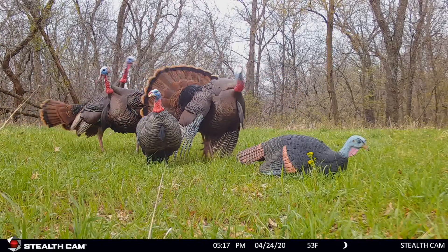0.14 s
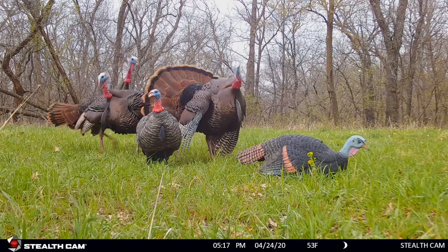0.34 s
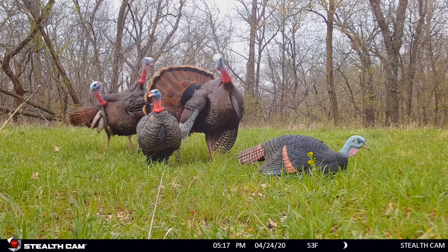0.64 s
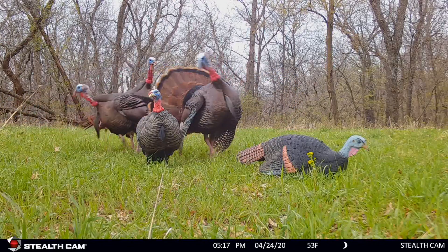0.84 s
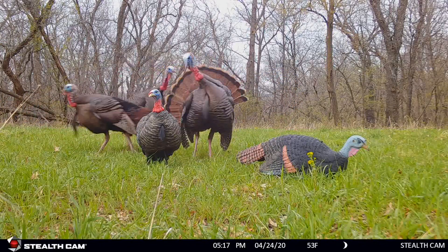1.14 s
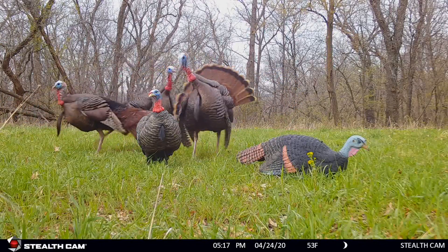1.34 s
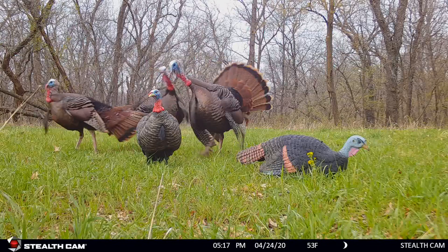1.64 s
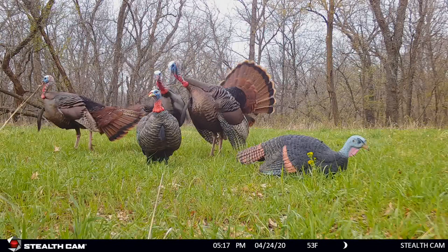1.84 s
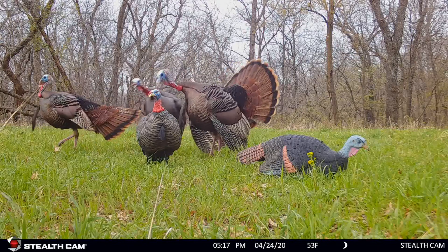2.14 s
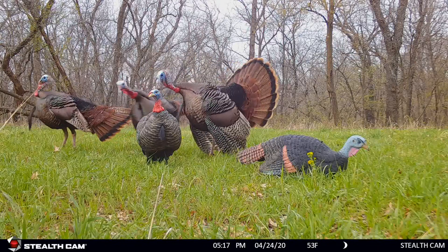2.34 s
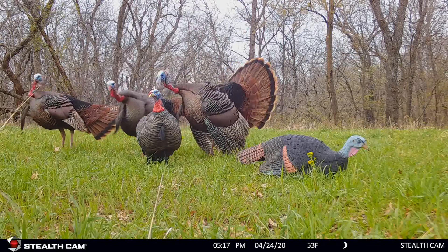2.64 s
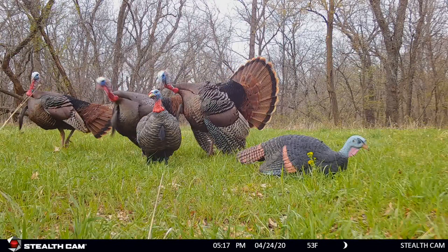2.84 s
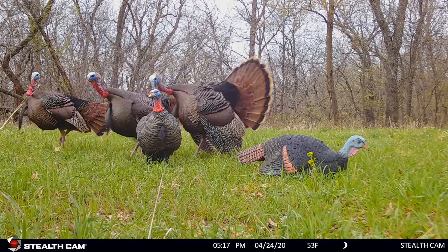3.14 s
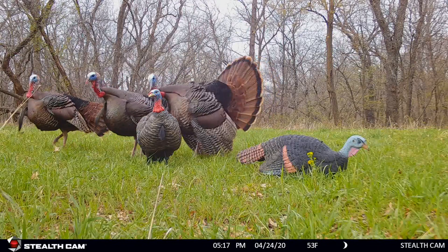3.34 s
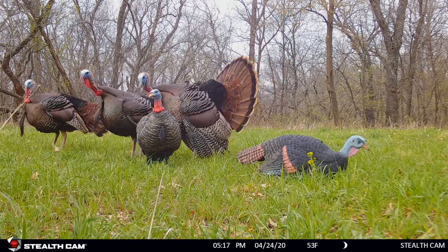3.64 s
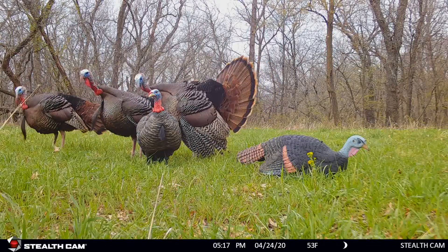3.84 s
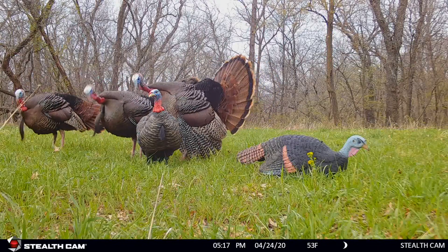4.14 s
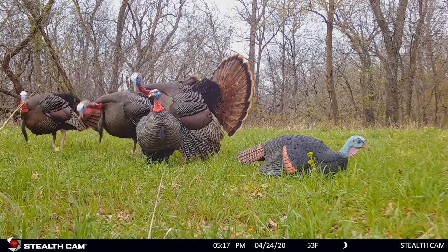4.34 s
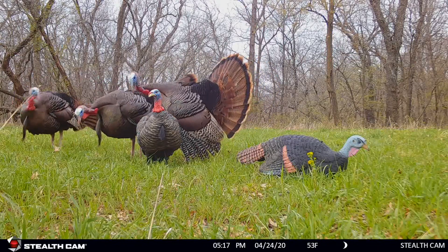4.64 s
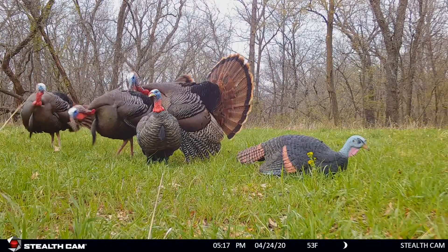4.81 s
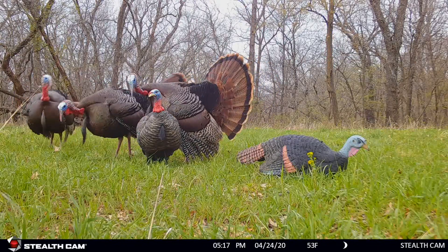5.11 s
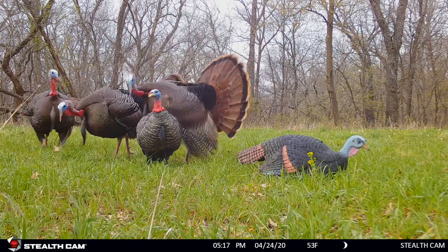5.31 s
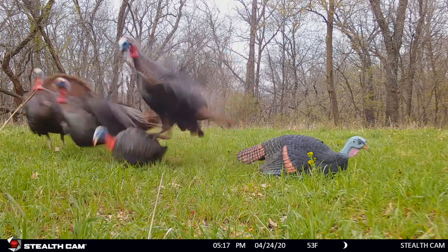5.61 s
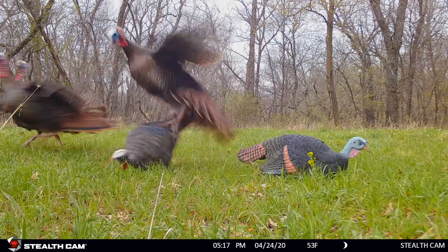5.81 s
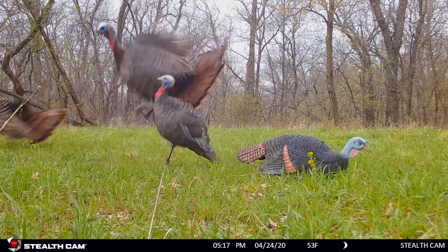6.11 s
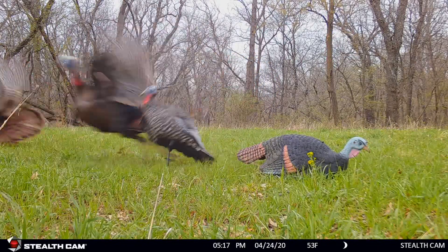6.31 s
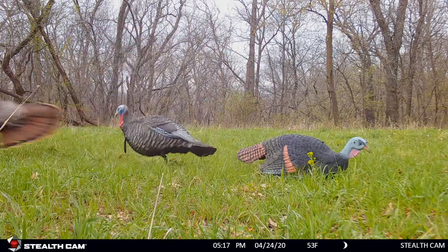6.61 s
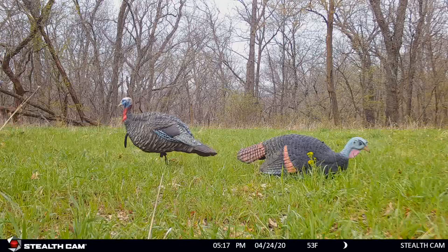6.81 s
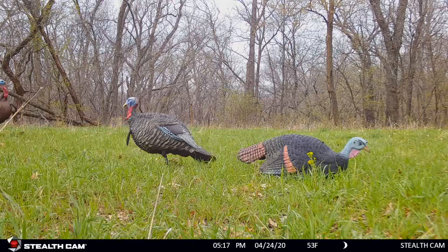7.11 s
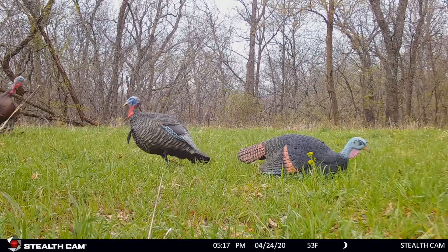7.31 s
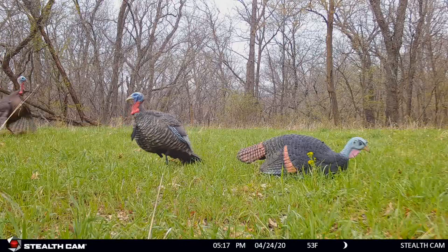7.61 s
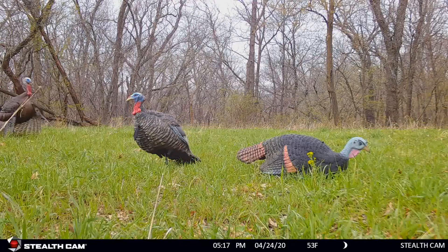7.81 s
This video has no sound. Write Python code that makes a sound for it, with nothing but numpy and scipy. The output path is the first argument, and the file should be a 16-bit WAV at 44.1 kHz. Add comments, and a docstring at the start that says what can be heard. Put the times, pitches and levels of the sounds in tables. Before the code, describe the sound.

Quiet purring from several turkeys, in short groups of quick low pulses, with dry stem ticks and slight feather brushing. After five seconds wind puffs and a thump lead into a sudden fight, with overloaded blows, crackling quills, flapping wings and a second burst shortly after. A hollow plastic decoy is knocked softly, then footsteps rustle through grass, one bird whines gently and faint purr notes return. Near, dry, open-air sound.

```python
"""Wild turkeys purr in gliding, swelling tones and step through rustling grass at a wood's edge.
A scuffle breaks out on a hollow plastic decoy: grainy noise makes feather swishes and wing flaps,
damped sines make snaps, thumps and a hollow knock, and the peaks overload the recorder.
Grass and footsteps return and one bird whines softly with a fluttering tone.
Shaped noise makes wind buffets, far rumble and steady hiss; a songbird whistles far away."""
import sys
import numpy as np
from scipy import signal
from scipy.fft import rfft, irfft, next_fast_len
from scipy.io import wavfile
from scipy.ndimage import uniform_filter1d, map_coordinates

SR = 44100
rng = np.random.default_rng(int(sys.argv[2]) if len(sys.argv) > 2 else 0)


def dump(signal):
    """Clip the signal to [-1, 1] and save it as 16-bit WAV at the path in sys.argv[1]."""
    limited = np.clip(np.atleast_2d(signal).T, -1, 1)
    pcm = np.round(limited * 32767).astype(np.int16)
    wavfile.write(sys.argv[1], SR, pcm)


N = 351036  # length in samples


def amp(db):
    """Decibels to linear amplitude."""
    return 10 ** (np.asarray(db) / 20)


def unit(x):
    """Scales x to an rms of 1."""
    return x / np.sqrt(np.mean(x ** 2) + 1e-20)


def curves(rows):
    """One value per sample for each column after the time."""
    s, *columns = np.transpose(rows)
    return [np.interp(np.arange(N) / SR, s, column) for column in columns]


def wobble(rate):
    """A smooth random curve, rate knots a second."""
    knots = rng.standard_normal(int(N * rate / SR) + 4)
    return map_coordinates(knots, [np.arange(N) * rate / SR])


def filtered(x, response):
    """Weights the spectrum of x by a function of frequency in Hz."""
    size = next_fast_len(N + 8192)
    spectrum = rfft(x, size) * response(np.fft.rfftfreq(size, 1 / SR))
    return irfft(spectrum, size)[..., :N]


def gain_at(spectrum):
    """The gain through (Hz, dB) points, read on a log frequency axis."""
    f, db = np.transpose([(1, -120), *spectrum, (SR / 2, -120)])
    return lambda hz: amp(np.interp(np.log(hz + 1), np.log(f), db))


def noise(spectrum, grain_db, grain_rate, patchy_db):
    """Noise of rms 1, broken into grains, with patches of random gain, coloured by (Hz, dB) points."""
    grains = rng.standard_normal(N) * amp(grain_db * wobble(grain_rate))
    z = signal.stft(grains, nperseg=256)[2]
    # Smoothing over frequency, then time, turns random gains into patches
    patches = uniform_filter1d(rng.standard_normal(z.shape), 6, 0)
    patches = uniform_filter1d(patches, 4, 1)
    x = signal.istft(z * amp(patchy_db * unit(patches)), nperseg=256)[1][:N]
    return unit(filtered(x, gain_at(spectrum)))


def add(out, s, x):
    """Mixes x into out, centred on second s."""
    i = round(s * SR) - len(x) // 2
    out[i:i + len(x)] += x[:N - i]


# Puffs of air on the microphone port. Each row: time of peak in seconds, level in dB, fall time in seconds.
GUST_PUFFS = [(2.163, -50, 0.082), (4.41, -52, 0.083), (4.7, -41.5, 0.085), (5.26, -36.5, 0.095),
              (5.487, -30, .04), (5.63, -39, 0.056), (5.83, -31, 0.027), (6.15, -48, .3), (6.78, -48, 0.19)]
CALM_DB, GUST_RISE = -60, 0.48  # wind between puffs; rise time over fall time


def gusts():
    """A calm wind with puffs that rise and die away exponentially."""
    t = np.arange(N) / SR
    wind = np.full(N, amp(CALM_DB))
    for s, db, fall in GUST_PUFFS:
        wind += amp(db) * np.exp(-np.abs(t - s) / np.where(t < s, GUST_RISE * fall, fall))
    return wind


# Colour of wind on the port. Each row: frequency in Hz, relative gain in dB.
BUFFET_COLOUR = [(12, -22), (25, -4.5), (60, -3.5), (100, -19)]


def wind_buffet():
    """Wind buffets the microphone port: very low noise rides on the gusts."""
    level = gusts() * amp(1.3 * wobble(14.0))
    return level * noise(BUFFET_COLOUR, grain_db=0.1, grain_rate=20, patchy_db=-1.3)


# Level of the far rumble. Each row: time in seconds, level in dB.
RUMBLE_LEVEL = [(0, -55), (0.68, -57), (5.09, -56), (5.3, -51.5), (6.6, -53.5), (6.742, -54), (7.076, -61),
                (7.96, -52.5)]
# Colour of the far rumble. Each row: frequency in Hz, relative gain in dB.
RUMBLE_COLOUR = [(50, -6), (90, 0.5), (160, -2), (430, -11.5), (800, -21.5)]


def tree_rumble():
    """Wind in far trees: low noise that slowly swells and sinks."""
    level = amp(curves(RUMBLE_LEVEL)[0] + 0.89 * wobble(11))
    return level * noise(RUMBLE_COLOUR, grain_db=0.76, grain_rate=50, patchy_db=0.5)


# Colour of the steady hiss. Each row: frequency in Hz, relative gain in dB.
AIR_COLOUR = [(250, -23), (500, -0.5), (850, -2), (1100, -5), (1750, -5), (2060, -8.5), (3800, -12),
              (10000, -15.5), (15500, -16)]


def air_hiss():
    """Broad steady noise under everything."""
    return amp(-61) * noise(AIR_COLOUR, grain_db=.8, grain_rate=25, patchy_db=.8)


# Rustle of walking in grass. Each row: time in seconds, level in dB.
WALK_LEVEL = [(0, -71), (0.8, -63.5), (1.7, -65), (2.05, -69.5), (2.3, -64), (2.67, -67.5), (3.13, -63),
              (3.7, -69), (4.55, -69.5), (5.3, -63), (6.6, -49), (6.804, -49), (7.1, -54.5), (7.96, -55.5)]
# Feet pressing the turf. Each row: time in seconds, level in dB.
FOOT_LEVEL = [(6.6, -55.5), (6.69, -55), (6.85, -58), (7.1, -64), (7.15, -53), (7.25, -66), (7.36, -56.5),
              (7.42, -64), (7.584, -55), (7.75, -56.5), (7.85, -56), (7.96, -61)]
# Colour of brushed grass. Each row: frequency in Hz, relative gain in dB.
GRASS_COLOUR = [(1180, -42), (2000, -11), (2160, -37), (2700, -18.5), (3700, -11), (8290, -2.5),
                (11600, -8.5), (15500, -20)]
# Colour of bodies and feet pressing. Each row: frequency in Hz, relative gain in dB.
BODY_COLOUR = [(200, -6), (320, -4), (1000, -14.5), (1750, -17.5), (2300, -20.5)]


def walking():
    """Blades rub in a bright grainy rustle; later, feet press the turf in duller noise."""
    t = np.arange(N) / SR
    walk = amp(curves(WALK_LEVEL)[0] + 1.2 * wobble(25))
    grass = walk * noise(GRASS_COLOUR, grain_db=1.0, grain_rate=1100, patchy_db=3.0)
    press = (t > FOOT_LEVEL[0][0]) * amp(curves(FOOT_LEVEL)[0] + 2.5 * wobble(70))
    return grass + press * noise(BODY_COLOUR, grain_db=3, grain_rate=300, patchy_db=1.2)


# The scuffle. Each row: time in seconds, feather hiss level in dB, wing flap level in dB.
SCUFFLE_LEVEL = [(5.3, -70, -47), (5.39, -47.5, -53), (5.445, -31.5, -35), (5.488, -25, -40),
                 (5.56, -29, -33), (5.61, -28, -24.5), (5.676, -35, -32), (5.834, -38, -42.5),
                 (5.936, -42.5, -41.5), (6.106, -40, -48), (6.24, -35, -54), (6.316, -30.5, -30.5),
                 (6.458, -40, -46), (6.6, -54, -58)]
# Colour of feather barbs. Each row: frequency in Hz, relative gain in dB.
FEATHER_COLOUR = [(1500, -54), (2290, -8), (2770, -4.5), (7100, 2), (8340, 2.5), (9800, -2.5), (15500, -13)]
# Colour of wing flaps. Each row: frequency in Hz, relative gain in dB.
FLAP_COLOUR = [(35, -20), (86, 15), (230, -9), (330, -16), (500, -33)]
BODY_DB, BODY_GROWS = -39.5, 1.35  # bodies colliding: level at the median hiss; swings wider than the hiss


def scuffle():
    """Hiss of feathers, colliding bodies and low wing flaps run together as three noises."""
    hiss_db, flap_db = curves(SCUFFLE_LEVEL)
    body_db = BODY_DB + BODY_GROWS * (hiss_db - np.median(SCUFFLE_LEVEL, axis=0)[1])
    hiss = amp(hiss_db + 2.5 * wobble(60))
    hiss = hiss * noise(FEATHER_COLOUR, grain_db=4.5, grain_rate=2000, patchy_db=2.2)
    body = amp(body_db + 1.5 * wobble(60))
    body = body * noise(BODY_COLOUR, grain_db=2.5, grain_rate=500, patchy_db=.7)
    flap = amp(flap_db + 1.3 * wobble(30))
    flap = flap * noise(FLAP_COLOUR, grain_db=0.5, grain_rate=230, patchy_db=5.0)
    return hiss + body + flap


def commotion():
    """Walking gives way to the scuffle and returns after it, with short crossfades."""
    t = np.arange(N) / SR
    edge = np.minimum(t - SCUFFLE_LEVEL[0][0], SCUFFLE_LEVEL[-1][0] - t)
    fight = np.clip(edge / 0.025, 0, 1)
    return fight * scuffle() + (1 - fight) * walking()


# Turkey purr notes. Each row: time of peak in seconds, level in dB, length in seconds,
# nominal start pitch in Hz, nominal end pitch in Hz.
PURR_NOTES = [(0.1282, -42, 0.014, 670, 622), (0.187, -43, .011, 760, 830),
              (0.2337, -39.5, 0.0082, 650, 1000), (0.2839, -42, .01, 730, 1056),
              (0.3286, -45, .008, 660, 937), (1.2282, -37, 0.021, 760, 570), (1.303, -35, 0.016, 790, 684),
              (1.3085, -43, 0.007, 720, 1006), (1.3513, -40, 0.0064, 620, 914),
              (1.4051, -49.5, 0.0065, 940, 1310), (2.1556, -28.5, 0.014, 796, 580),
              (2.2023, -36.5, .01, 740, 1105), (2.2469, -36.5, 0.012, 770, 1140),
              (2.2965, -41.5, 0.011, 770, 1210), (3.2266, -38.5, 0.015, 560, 647),
              (3.299, -48, 0.0068, 750, 726), (3.3135, -32.5, 0.01, 644, 943),
              (3.359, -36.5, 0.01, 600, 1080), (3.4087, -45, 0.01, 773, 1070),
              (3.4574, -49, .015, 630, 864), (3.529, -50, 0.011, 600, 680),
              (3.5389, -44.5, 0.0058, 866, 1080), (3.579, -51, .005, 900, 990),
              (3.62, -40, 0.0054, 630, 1100), (3.6629, -45, 0.0069, 700, 1130),
              (4.3897, -31, 0.019, 808, 521), (4.4401, -37, .008, 570, 876),
              (4.4892, -36.5, 0.0039, 740, 977), (4.5342, -46.5, .008, 730, 920),
              (7.8392, -41.5, 0.01, 740, 830), (7.9328, -42.5, 0.01, 800, 1125)]
RISE_UP, RISE_DOWN = 0.402, 0.65  # share of a note spent swelling, for upward and downward glides
GLIDE_MID, GLIDE_SPAN = 0.5, 0.27  # middle and width of the glide as shares of the note
BEAK_HZ, BEAK_WIDTH_HZ, BEAK_DB = 1170, 200, 13  # a resonance that lifts the second partial of low notes
THROAT_FROM_HZ = 850  # higher notes drive the throat resonance harder
TRAIL_S, TRAIL_DB = .004, -9  # upward glides get a fainter copy just behind, so that they beat
WAVER_HZ = 25  # how far a note's pitch wanders


def notes(table, unsteady_db, overtone_db, throat_db, flick_hz):
    """Short tones that swell and glide; beak and throat resonances lift their overtones."""
    out, t = np.zeros(N), np.arange(-.1, .1, 1 / SR)
    waver = np.tile(WAVER_HZ * wobble(250), 2)
    for s, db, length, start_hz, end_hz in table:
        upward = end_hz > start_hz
        rise = length * (RISE_UP if upward else RISE_DOWN)
        fall = length - rise
        glide = np.tanh(((t + rise) / length - GLIDE_MID) / GLIDE_SPAN)
        hz = (start_hz + end_hz) / 2 + 0.6 * (end_hz - start_hz) * glide
        # Upward glides flick higher still as they fade
        hz += flick_hz * upward * np.clip(t / fall - .8, 0, 2)
        beak = np.exp(-((2 * hz - BEAK_HZ) / BEAK_WIDTH_HZ) ** 2)
        second = amp(overtone_db + BEAK_DB * beak)
        phase = 2 * np.pi * np.cumsum(hz + waver[round(s * SR):][:len(t)]) / SR
        swell = np.exp(-1.15 * np.abs(t / np.where(t < 0, rise, fall)) ** 2.5)
        # Partials 3 to 6 are heard where they fall near 3500 Hz
        throat = sum(np.sin(k * phase) * np.exp(-((k * hz - 3500) / 500) ** 2) for k in range(3, 7))
        throat = amp(throat_db) * (hz / THROAT_FROM_HZ) ** 2 * throat
        tone = amp(db) * swell * (np.sin(phase) + second * np.sin(2 * phase) + throat)
        add(out, s, tone)
        add(out, s + TRAIL_S, amp(TRAIL_DB) * upward * tone)
    return out * amp(unsteady_db * wobble(220))


def purrs():
    """Turkey purrs: quick low notes, coloured by beak and throat."""
    return notes(PURR_NOTES, unsteady_db=1.8, overtone_db=-28.5, throat_db=-27, flick_hz=250)


# Feathers and grass brushed. Each row: time of peak in seconds, level in dB, length in seconds,
# share of bright barbs in dB, share of the body under them in dB.
BRUSHES = [(0.233, -63.5, 0.048, -4, -15), (0.964, -64, 0.049, 2, -19), (1.1085, -56, 0.025, 3, -2),
           (1.384, -55, 0.053, -1.5, -1.5), (2.691, -57.5, 0.021, -2, -13), (3.162, -53.5, 0.039, -1.5, -5),
           (4.286, -53.5, .013, -4, -20), (4.843, -61, .042, -2.4, -5), (5.398, -34.5, 0.016, -2.5, -11.5),
           (5.47, -7.5, 0.0087, -6.5, -3), (5.5062, -13.5, 0.007, -1, -8), (5.515, -8, 0.011, -3, -12),
           (5.532, -21, 0.0063, -15, 5), (5.5913, -19, 0.034, -2.5, 0.5), (5.696, -35, 0.012, 1, 8),
           (5.762, -34, 0.013, -1.5, -1.5), (5.797, -32, 0.005, -4, 6), (5.817, -34, 0.019, -3.5, 6.5),
           (5.85, -32.5, 0.013, 2, -0.5), (5.9, -41, 0.013, -5, 1), (5.927, -38.5, 0.014, 2, 0.5),
           (6.018, -35, 0.02, -3.5, -5), (6.054, -49, .016, -7.6, -11), (6.099, -42, 0.0092, 10, 3),
           (6.108, -23.5, 0.0078, -2.5, -12), (6.125, -23, 0.019, -3.5, -4),
           (6.177, -26.5, 0.011, -6, -0.5), (6.212, -22, 0.0091, -14, -5), (6.2737, -19, 0.017, -2.5, -6),
           (6.296, -24.5, 0.014, -1.5, -4.5), (6.33, -32.5, .012, -18, -11), (6.3664, -28, 0.012, -23, 2.5),
           (6.396, -28, 0.012, -14, -10), (6.454, -35, 0.012, -1.5, -4.5), (6.455, -34.5, 0.0073, -6, -4),
           (6.502, -48, 0.022, -3, 10.5), (6.58, -52.5, 0.031, -8, 4), (6.689, -47, 0.023, -0.5, 0),
           (6.743, -50, 0.017, -4, -12), (6.774, -50.5, 0.014, -3, 0), (6.813, -56, .045, 0, -19),
           (6.917, -48, 0.064, -.6, -7.5), (7.186, -49.5, 0.058, -1, -7.5), (7.365, -67, .045, -1, 6),
           (7.61, -52, 0.11, -1.5, -4.5)]
BRUSH_RISE = 0.4  # share of a brush's length that sets its rise


def swishes():
    """Each brush opens three layers of grainy noise: dull and bright barbs and the body under them."""
    dull, bright, body = np.zeros(N), np.zeros(N), np.zeros(N)
    t = np.arange(-.12, .12, 1 / SR)
    for s, db, length, bright_db, body_db in BRUSHES:
        rise, fall = BRUSH_RISE * length, (1 - BRUSH_RISE) * length
        shape = np.where(t < 0, np.exp(-.7 * (t / rise) ** 2), np.exp(-.75 * t / fall))
        shape = amp(db) * shape
        # The dull layer takes the power that the bright one leaves
        add(dull, s, shape * np.sqrt(np.clip(1 - amp(2 * bright_db), .02, 1)))
        add(bright, s, shape * amp(bright_db))
        add(body, s, shape * amp(body_db))
    barbs = noise(FEATHER_COLOUR, grain_db=5.5, grain_rate=2600, patchy_db=1.5)
    low = filtered(barbs, lambda hz: 1 / (1 + (hz / 7800) ** 12))
    under = noise(BODY_COLOUR, grain_db=2.5, grain_rate=600, patchy_db=.7)
    return dull * unit(low) + bright * unit(barbs - low) + body * under


SMALL_SNAPS, SMALL_HZ = 50, 7000  # how many chance snaps; their typical centre
SMALL_OVER_DB, SMALL_SPREAD_DB = 8, 3.5  # their level over the rustle; its random spread


def small_snaps():
    """Chance snaps whose size follows the rustle of grass and feathers: rows as the main snaps."""
    chance = rng.standard_normal((SMALL_SNAPS, 2))
    s = rng.uniform(.02, N / SR - .02, SMALL_SNAPS)
    rustle_db = np.maximum(curves(WALK_LEVEL)[0], curves(SCUFFLE_LEVEL)[0])[(s * SR).astype(int)]
    db = rustle_db + SMALL_OVER_DB + SMALL_SPREAD_DB * chance[:, 0]
    return np.c_[s, db, SMALL_HZ * np.exp(.18 * chance[:, 1])]


# Quill and stem snaps. Each row: time in seconds, level in dB, centre frequency in Hz.
MAIN_SNAPS = [(0.6815, -40, 8700), (0.7545, -36, 8200), (0.9755, -35, 8900), (1.1192, -41, 12000),
              (1.3808, -42, 7800), (1.7503, -36, 7600), (1.9119, -34.5, 7060), (2.4944, -36, 8100),
              (2.8548, -41, 10000), (3.8288, -38, 7000), (4.1504, -30.5, 6260), (4.7282, -37, 7650),
              (5.3974, -13.5, 7150), (5.4197, -17, 3650), (5.46, -12, 7000), (5.4665, 4, 3100),
              (5.529, 3.8, 5250), (5.5417, 1, 7800), (5.5687, -8, 8300), (5.5855, -12, 7500),
              (5.5941, -11, 7300), (5.5983, 2, 6360), (5.6075, -7, 8900), (5.6211, -22, 6780),
              (5.7033, -7, 9050), (5.7959, -13, 6900), (5.7635, -7.5, 7800), (5.811, -5.5, 6200),
              (5.8116, 0, 3130), (5.9266, -14, 8500), (5.9893, -9.5, 9600), (6.0007, -9.5, 8100),
              (6.0236, -27, 7200), (6.1266, -6, 6700), (6.1653, -4, 5070), (6.177, -20, 6200),
              (6.209, -20, 4450), (6.1956, -26, 5200), (6.2167, -20, 5070), (6.2487, 2.2, 4230),
              (6.2662, 3.3, 5000), (6.2718, -20, 5500), (6.2752, 2, 6030), (6.2769, 6, 5950),
              (6.2987, -11, 8500), (6.3684, 1.5, 3680), (6.3948, -9.5, 5750), (6.4485, -22, 6500),
              (6.6745, -26, 7800), (6.8265, -29, 9000), (7.5833, -35, 7600), (7.6633, -33, 8000),
              (7.7312, -29, 8460)]
# Colour of the cracks in a snap. Each row: frequency in Hz, gain in dB.
STEM_COLOUR = [(1500, -30), (2500, -13), (8300, 2), (11000, -7), (15500, -11)]
KICK_DB = -26  # the low kick under a snap


def snaps():
    """A snap is a few damped cycles at its centre, a spatter of noise cracks and a low kick."""
    out, cracks = np.zeros(N), np.zeros(N)
    t = np.arange(-.01, .01, 1 / SR).clip(0)
    rows = np.r_[MAIN_SNAPS, small_snaps()]
    spatter = rng.standard_normal((len(rows), len(t)))
    for (s, db, hz), puff in zip(rows, spatter):
        ring = np.sin(2 * np.pi * hz * t) * np.exp(-t * hz / 1.35) * np.tanh(t * hz / 0.23)
        kick = amp(KICK_DB) * np.sin(2 * np.pi * 700 * t) * np.exp(-t / 0.002)
        add(out, s - .0004, amp(db) * (ring - kick))
        add(cracks, s - .0006, amp(db - 10.0) * puff * (t > 0) * np.exp(-t / 0.0017))
    return out + filtered(cracks, gain_at(STEM_COLOUR))


# Far whistles. Each row: time of peak in seconds, level in dB, length in seconds,
# nominal start pitch in Hz, nominal end pitch in Hz.
SONG_NOTES = [(3.43, -66, .07, 2340, 2800), (3.595, -65, .055, 2650, 2980), (3.78, -69, .06, 2430, 2620),
              (3.895, -70, .046, 2500, 2800)]


def songbird():
    """A far bird's nearly pure whistles, each gliding upward."""
    return notes(SONG_NOTES, unsteady_db=2.5, overtone_db=-40, throat_db=-60, flick_hz=0)


def radiated(hz):
    """Ground contact radiates little below about 34 Hz."""
    return 1 / (1 + (34.4 / (hz + 1)) ** 2)


# Feet, wing pushes and blows. Each row: time of peak in seconds, level in dB, pitch in Hz.
CONTACTS = [(4.6893, -25.5, 125), (4.706, -26, 55), (4.784, -37, 69), (5.235, -31, 65), (5.2844, -24.5, 87),
            (5.454, -12, 520), (5.4775, 6.5, 192), (5.482, -6.5, 92), (5.4912, -7, 148), (5.5251, -12, 163),
            (5.5427, -18, 142), (5.5673, -29, 150), (5.586, -22, 142), (5.6171, -10, 238), (5.641, -29, 85),
            (5.7079, -16.5, 170), (5.7978, -17, 179), (5.826, -20.5, 133), (5.9262, -32, 166),
            (5.9598, -30.5, 177), (5.9863, -40, 154), (6.0226, -13, 87.5), (6.0335, -24, 91),
            (6.1284, -19, 145), (6.168, -20, 111), (6.1963, -19, 128), (6.2504, -22, 160),
            (6.282, -34, 256), (6.3016, -31, 158), (6.3496, -16.5, 180), (6.4072, -24, 105),
            (6.498, -20.5, 624), (6.5032, -18, 102), (6.5855, -28, 101), (6.89, -47, 45),
            (6.9638, -32.5, 123), (7.139, -37, 151), (7.61, -35.5, 220), (7.634, -35, 302),
            (7.8523, -37, 125)]
THUMP_RISE, THUMP_FALL = 0.29, 0.49  # in cycles of its own pitch


def thumps():
    """Soft contact: one or two low cycles, a short dip in pressure, then a push."""
    out, t = np.zeros(N), np.arange(-.08, .08, 1 / SR)
    for s, db, hz in CONTACTS:
        shape = np.exp(-np.where(t < 0, (t * hz / THUMP_RISE) ** 2, t * hz / THUMP_FALL))
        add(out, s, amp(db) * shape * np.sin(2 * np.pi * hz * t + 1.62))
    return filtered(out, radiated)


# Knocks on the hollow decoy. Each row: time in seconds, level in dB.
KNOCKS = [(6.496, -31), (6.581, -44)]
# Ringing modes of the shell. Each row: frequency in Hz, relative level in dB, 60 dB decay time in seconds.
SHELL_MODES = [(396, 2.5, 0.15), (820, -24, 0.16)]


def decoy_knocks():
    """A knock rings the modes of the hollow shell as decaying sines."""
    out, t = np.zeros(N), np.arange(-.2, .2, 1 / SR).clip(0)
    for s, db in KNOCKS:
        for hz, level, t60 in SHELL_MODES:
            add(out, s, amp(db + level - 60 * t / t60) * np.sin(2 * np.pi * hz * t))
    return filtered(out, radiated)


# Two soft whines, a list of rows each. Each row: time in seconds, pitch in Hz, level in dB.
WHINE_CURVES = [
    [(7.02, 880, -60), (7.05, 880, -49.5), (7.08, 894, -52), (7.1, 850, -69)],
    [(7.13, 866, -67), (7.175, 900, -47), (7.203, 836, -59), (7.25, 877, -47.5), (7.3, 815, -48),
     (7.33, 730, -59), (7.352, 610, -56), (7.375, 500, -59)],
]


def whine():
    """A soft clear tone whose pitch and level flutter together at about 37 Hz."""
    out, t = np.zeros(N), np.arange(N) / SR
    for rows in WHINE_CURVES:
        hz, db = curves(rows)
        flutter = np.sin(2 * np.pi * 37 * t + 0.87 * wobble(24))
        gate = np.clip(np.minimum(t - rows[0][0], rows[-1][0] - t) / 0.01, 0, 1)
        level = gate * amp(db + 2.0 * flutter + 2.1 * wobble(90))
        out += level * np.sin(2 * np.pi * np.cumsum(hz * (1 + 0.053 * flutter)) / SR)
    return out


def tree_echo(x, t60):
    """A diffuse answer from the trunks: decaying noise that begins after 12 ms."""
    t = np.arange(SR // 2) / SR
    tail = rng.standard_normal(len(t)) * amp(-60 * t / t60) * (t > .012)
    return signal.fftconvolve(x, tail / np.linalg.norm(tail))[:N]


def mic_notch(hz):
    """The microphone's colour: near sounds are hollowed by a notch around 1900 Hz."""
    return amp(-8 * np.exp(-((hz - 1900) / 380) ** 2))


def scene():
    """Mixes the voices, near contacts, rustle, echoes and weather."""
    calls = purrs() + whine()
    song = songbird()
    near = filtered(swishes() + snaps() + thumps() + decoy_knocks(), mic_notch)
    rustle = filtered(commotion(), mic_notch)
    echo = amp(-24) * tree_echo(calls, t60=.3)
    echo += tree_echo(song, t60=.45)  # as strong as the far song itself
    echo += amp(-20) * tree_echo(near, t60=.12)
    weather = wind_buffet() + tree_rumble() + air_hiss()
    return (calls + song + near + echo + rustle + weather)[None]


def record(dry):
    """The loudest blows clip just under full scale; nothing passes above the band limit."""
    clipped = dry / (1 + np.abs(dry / .96) ** 16) ** (1 / 16)
    return filtered(clipped, lambda hz: hz < 15640)


dry = scene()
out = record(dry)
dump(out)
```